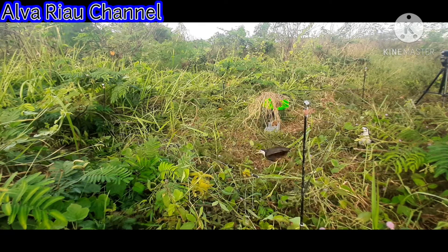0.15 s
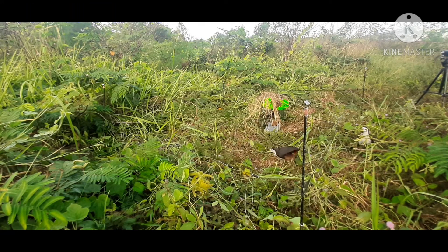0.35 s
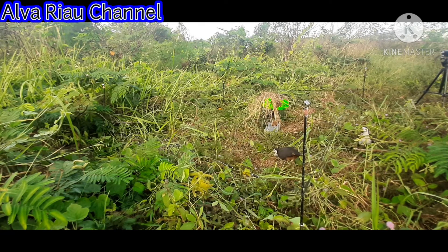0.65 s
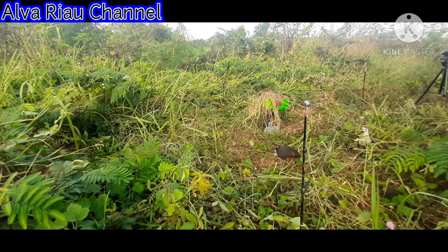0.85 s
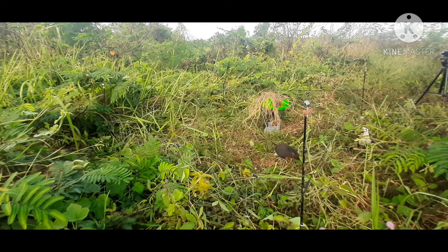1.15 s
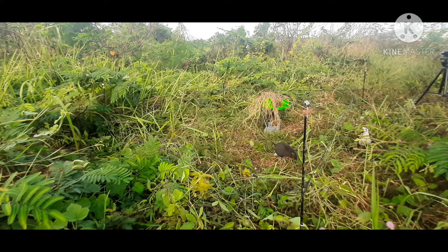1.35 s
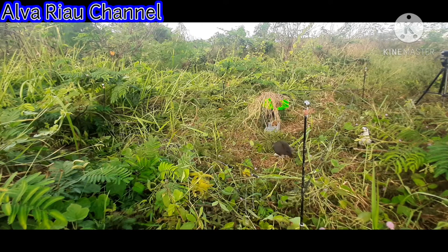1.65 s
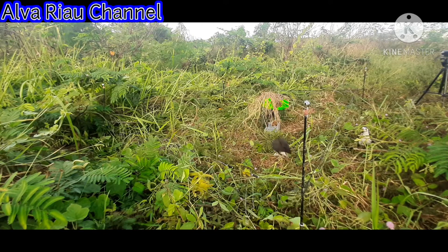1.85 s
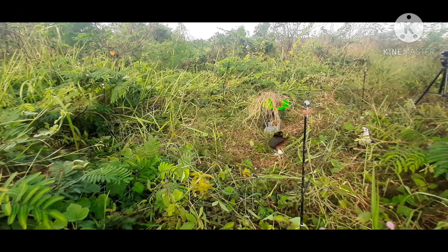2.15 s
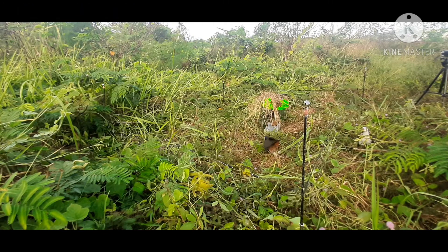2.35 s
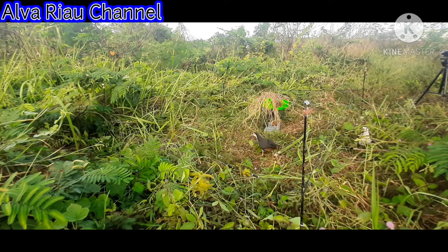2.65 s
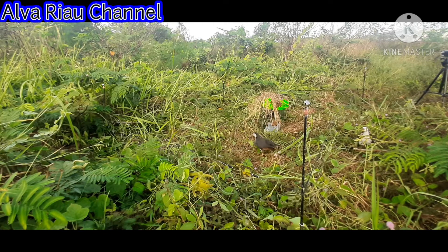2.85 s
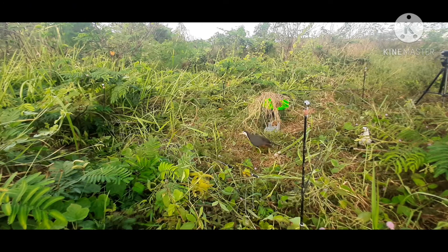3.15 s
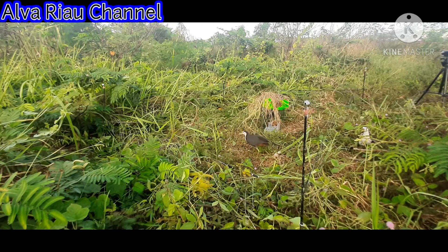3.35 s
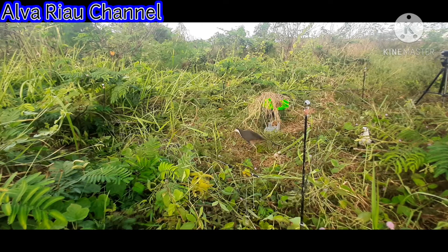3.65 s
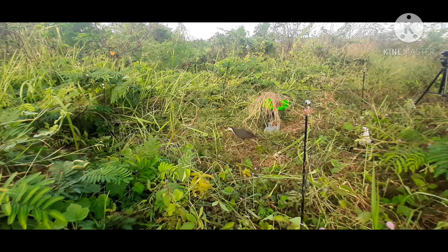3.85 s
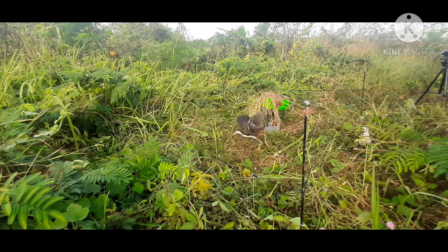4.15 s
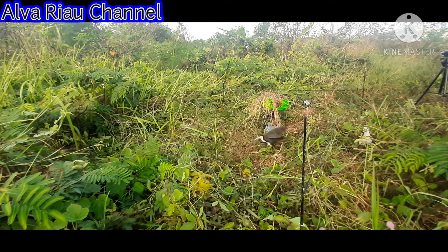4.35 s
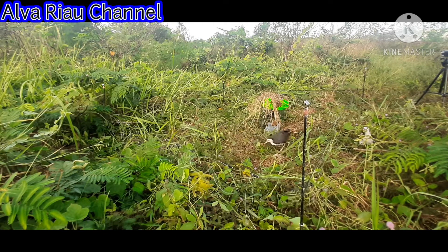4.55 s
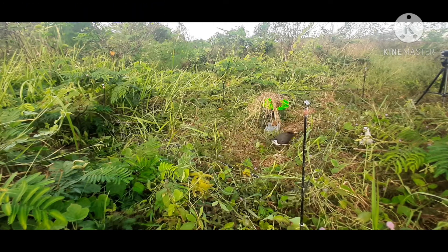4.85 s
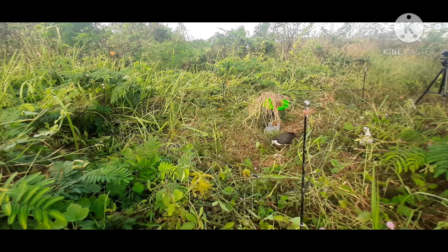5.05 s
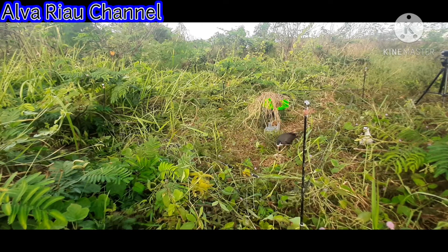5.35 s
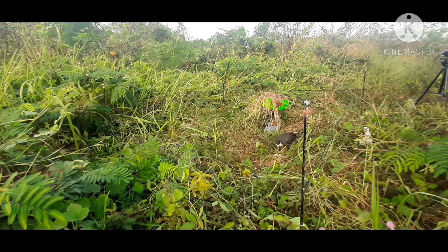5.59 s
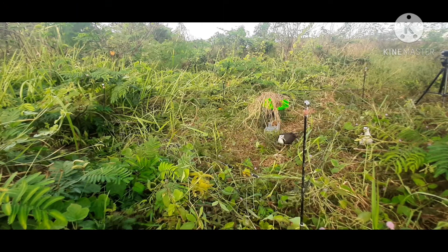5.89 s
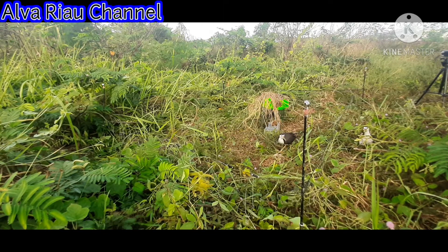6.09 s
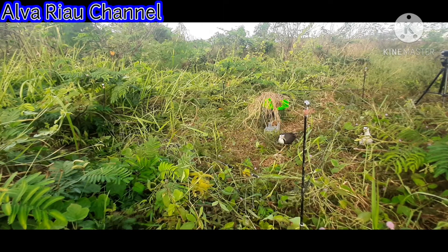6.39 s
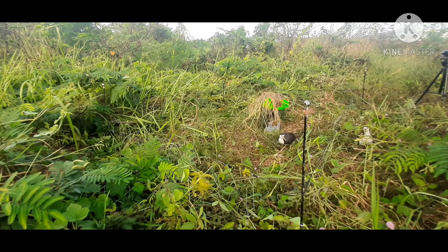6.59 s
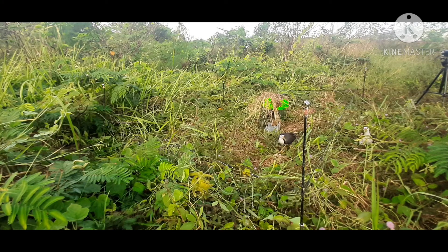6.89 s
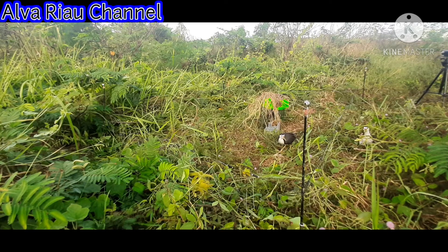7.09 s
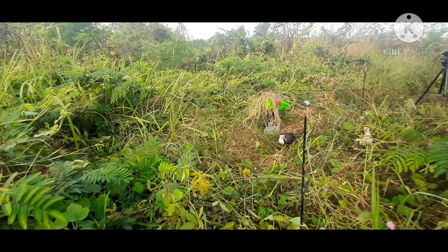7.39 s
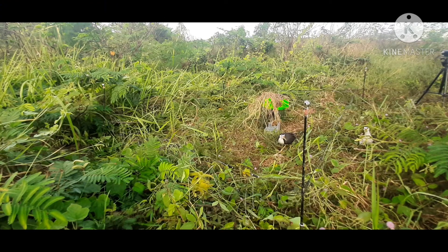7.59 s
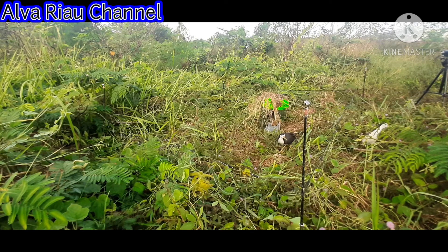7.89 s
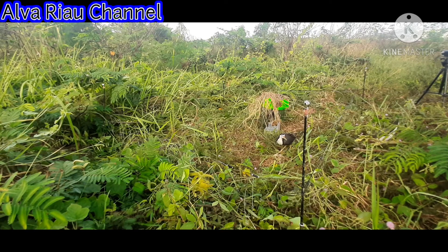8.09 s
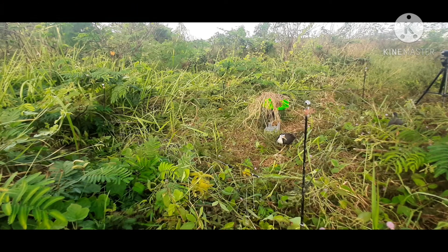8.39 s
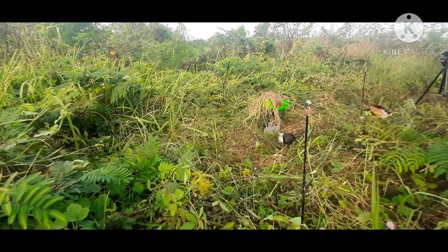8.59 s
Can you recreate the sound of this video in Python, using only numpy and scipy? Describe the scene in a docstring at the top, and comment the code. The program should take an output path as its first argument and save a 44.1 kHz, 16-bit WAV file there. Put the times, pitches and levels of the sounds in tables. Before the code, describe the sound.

In open grassy marsh, a bird gives an even series of short harsh croaks, dominant and fairly dry, slightly right of centre in stereo. Distant crickets, small gliding whistles and a faint trilling bird sit far below. Light metal pieces chatter at first, clink near the middle, then jingle most fully at the end. Soft grunts, small grass swishes and one brief insect buzz add detail over a quiet low rumble.

```python
"""Marsh undergrowth on two microphones: light metal chatter, then a waterhen's 'kwaak' about twice a second,
each a raspy start, a period-doubled break and a clear arched note; short throaty grunts fall between calls.
Small birds whistle in glides and a far trill chirps in phrases; from 4.1 s struck metal rings, noise swishes
in the grass and an insect's tone buzzes; more swishes and the fullest jingle end it.
Throughout, chirping crickets and the coloured noise of a far marsh sit over a low outdoor rumble."""
import sys
import numpy as np
from scipy import signal
from scipy.fft import rfft, irfft, next_fast_len
from scipy.io import wavfile
from scipy.ndimage import map_coordinates

SR = 44100
rng = np.random.default_rng(int(sys.argv[2]) if len(sys.argv) > 2 else 0)


def file_out(sig):
    """Save sig as 16-bit WAV at sys.argv[1]."""
    # one column per channel
    cols = np.atleast_2d(sig).T
    # limit, then scale
    lim = np.clip(cols, -1, 1)
    pcm = np.round(lim * 32767).astype(np.int16)
    wavfile.write(sys.argv[1], SR, pcm)


N = 384993
T = np.arange(N) / SR  # time [s]

# Levels are relative, ahead of the mix and of each microphone's share.
# every call has three stages: a raspy opening, a break into half pitch, and a clear note (s after its start)
BREAK_S, BREAK_TAKES_S, CLEAR_S, CLEAR_TAKES_S = .038, .0033, .056, .015
# the voice scoops up into its opening pitch and leaps from it at the break
SCOOP_SHARE, SCOOP_S, LEAP_TAKES_S = .17, .00516, .015
# the clear note climbs to its top, sags, and flicks up as the beak shuts (shares of the top pitch)
CLIMB_SHARE, CLIMB_S, CLIMB_TAKES_S = .16, .056, .027
TOP_S, SAG_SHARE, SAG_POWER, FLICK_SHARE, FLICK_TAKES_S = .07, .1433, 1.9, .08, .008
# loudness: the opening swells, the note holds and is cut off
OPEN_DB, SWELL_DB_PER_S, BREAK_DB, NOTE_DB, RELEASE_DB_PER_S = -38.5, 124.5, -35.5, -31.5, 2806
# overtones: weak in the opening, full in the note, fading as it sags; higher calls are brighter
OPEN_OVERTONE_DB, BREAK_OVERTONE_DB, NOTE_OVERTONE_DB, SAG_OVERTONE_DB = -26.5, -24, 0, -8
USUAL_TOP_HZ, BRIGHT_DB_PER_HZ = 1223.7, .0864
# half-pitch lines: strongest at the break, dying away in the note
OPEN_HALF_DB, BREAK_HALF_DB, NOTE_HALF_DB, HALF_FADE_DB_PER_S = -11, 3, -14.5, 448.5
# roughness of each stage, to be scaled by the rasp of the call
OPEN_ROUGH, BREAK_ROUGH, NOTE_ROUGH = .34, .3, .03
# where the voice catches it dips, roughens and scoops up again from below, in proportion to the rasp
CATCH_TAKES_S, CATCH_DIP_DB, CATCH_DROP_SHARE, CATCH_RECOVER_S = .003, -7, .3, .007
CATCH_ROUGH, CATCH_ROUGH_S = .75, .007
# partials flicker in proportion to their multiple, and slip in phase with its square
FLICKER_DB, FLICKER_PER_S, SLIP_RAD, SLIP_PER_S = .6, 110, .009, 500
BEAK_HZ = 1850  # the half-shut beak holds back the partials around and above this until the note opens
SHUT_HZ, SHUT_DB, SHUT_T60_S = 1226, -39, .037  # the cut-off leaves the throat ringing for a moment
FLARE_S, FLARE_TAKES_S, FLARE_DB = .098, .008, 6  # a second rasp flares in the treble as the note sags
METAL_DETUNE_SHARE = .0013  # the pieces touch, so each tap rings a little off the last
TICK_S, SCRAPE_S, SCRAPE_DB = .0008, .008, -22.5  # a sharp tick with a faint scrape after it
CHATTER_PER_S, CHATTER_SPREAD_DB = 90, 3
TRILL_SWELL_S, TRILL_SWELL_DB, TRILL_FADE_S = .45, 24, .03
WHISTLE_ARCH_HZ = 45.6
# one insect's buzz swells, rises slowly in pitch and stops short
BUZZ_S, BUZZ_LENGTH_S, BUZZ_ATTACK_S, BUZZ_RELEASE_S = 4.82, .69, .33, .03
BUZZ_HZ, BUZZ_RISE_HZ_PER_S, BUZZ_THROB_HZ, BUZZ_DB = 8760, 520, 68, -68
BIRD_LEFT_DB = -3.2
TOP_HZ = 15600


def undb(db):
    """Decibels to gain."""
    return 10 ** (np.asarray(db) / 20)


def unit(x):
    """Scale to rms 1."""
    return x / np.sqrt(np.mean(np.abs(x) ** 2))


def add(out, s, x):
    """Mix x into out from time s."""
    i = max(int(s * SR), 0)
    out[i:i + len(x)] += x[:max(N - i, 0)]


def colour(x, points):
    """Filter by a spectrum of (Hz, dB) points."""
    hz, db = np.transpose(points)
    f = np.maximum(np.fft.rfftfreq(len(x), 1 / SR), 1)
    gain = undb(np.interp(np.log(f), np.log(np.maximum(hz, 1)), db))
    return irfft(rfft(x) * gain, len(x))


def noise(points, size=N):
    """Coloured noise, brought to rms 1."""
    white = rng.standard_normal(next_fast_len(size, True))
    return unit(colour(white, points)[:size])


def wander(t, rate):
    """Smooth chance with spread near 1 that changes rate times a second."""
    knots = rng.standard_normal(int(t[-1] * rate) + 2)
    return map_coordinates(knots, [t * rate], order=2, mode="nearest")


def resonate(x, hz, width_hz):
    """One resonance, gain 1 at its centre."""
    return signal.lfilter(*signal.iirpeak(hz, hz / width_hz, fs=SR), x)


def highpass(x, hz):
    """A steep cut below hz."""
    return signal.sosfilt(signal.cheby2(6, 40, hz, "highpass", fs=SR, output="sos"), x)


def ease(t, at, takes):
    """A smooth step from 0 to 1, centred on at."""
    return .5 + .5 * np.sin(np.pi * np.clip((t - at) / takes, -.5, .5))


def bump(t, at, takes):
    """A brief smooth rise from 0 to 1 and back."""
    return np.exp(-((t - at) / takes) ** 2)


def held(s, length, attack, release):
    """Attack, hold and release of one event, as a gain."""
    return np.clip(np.minimum((T - s) / attack, (s + length - T) / release), 0, 1)


def place(x, left_db, lag_ms):
    """Two microphones: the left hears x at left_db and lag_ms later than the right (earlier if negative)."""
    late = map_coordinates(x, [np.arange(N) - lag_ms * SR / 1000], order=3)
    return np.array([undb(left_db) * late, x])


def waterhen():
    """The near bird's calls, with grunts in some of the gaps."""
    # calls: (time [s], length [s], level [dB], top pitch [Hz], opening pitch [Hz], rasp [0-1],
    #         catch of the voice after the start [s])
    call_rows = [(0.232, 0.11, -1, 1218, 869, 0.87, 0.035), (0.689, 0.1, 0.5, 1182, 814, 0.17, 0.041),
                 (1.185, 0.11, 1, 1181, 713, 0.9, .024), (1.6288, .11, 0.6, 1203, 861, 0.46, 0.04),
                 (2.079, 0.11, 1, 1198, 878, 0.58, 0.029), (2.516, 0.11, 0.7, 1202, 881, 0.68, 0.028),
                 (2.965, 0.11, 0.5, 1193, 827, 0.63, 0.0079), (3.4057, 0.11, 0, 1211, 848, 0.65, 0.031),
                 (3.85, 0.11, 1, 1205, 804, 0.6, 0.0093), (4.2974, 0.11, 1.5, 1202, 869, 0.42, 0.037),
                 (4.7437, 0.114, 0, 1206, 894, 0.89, 0.033), (5.188, 0.11, 0.5, 1199, 898, 0.75, 0.022),
                 (5.6439, 0.11, 1, 1200, 853, 0.8, 0.015), (6.095, 0.11, 0.5, 1195, 892, 0.71, 0.037),
                 (6.5478, 0.11, 0.5, 1199, 875, 0.57, 0.036), (7.004, 0.11, 0.5, 1187, 863, 0.34, .037),
                 (7.4625, 0.113, 1, 1196, 860, 0.54, 0.031), (7.957, 0.11, 0.5, 1184, 770, 0.74, .011),
                 (8.401, 0.11, 1.4, 1194, 859, 0.9, 0.0249)]
    # grunts: (time [s], length [s], level [dB], throat resonance [Hz],
    #          low thump [dB re throat], sharpness [dB re throat])
    grunt_rows = [(0.784, 0.016, -35, 1200, -26, -16), (0.845, 0.019, -39.5, 1070, -2, -19.5),
                  (1.362, 0.027, -40.5, 1060, -2.5, -31), (1.938, 0.028, -43.5, 1030, 0, -48),
                  (4.663, 0.0085, -46.5, 1263, -3.5, -36), (7.821, 0.016, -32, 1266, -13.5, -7.5),
                  (8.170, 0.018, -34, 1290, -14, -8), (8.712, 0.012, -41, 1330, -22, -5)]
    out = np.zeros(N)
    for s, length, db, top_hz, open_hz, rasp, catch_s in call_rows:
        add(out, s, undb(db) * call(length, top_hz, open_hz, rasp, catch_s))
    for s, length, db, hz, thump_db, sharp_db in grunt_rows:
        add(out, s, undb(db) * grunt(length, hz, thump_db, sharp_db))
    return out


def call(length, top_hz, open_hz, rasp, catch_s):
    """The syrinx croaks and catches, doubles its period, then locks into an arched note with frayed overtones."""
    # partials of the voice, the odd ones strong: (multiple of the pitch, level [dB re fundamental])
    partials = [(2, -23), (3, -1.5), (4, -20.5), (5, -14.5), (7, -29)]
    # lines between the partials: (multiple of the pitch, level [dB before the split])
    half_partials = [(.5, -3), (1.5, -5), (2.5, -5.5), (3.5, 1)]
    # faint lines between and beside the high partials: (multiple of the pitch, level [dB before the flare])
    frayed_partials = [(4.5, -34.5), (5.5, -34), (6, -52), (6.5, -30.5), (8, -64)]
    t = np.arange(int(.14 * SR)) / SR
    hz, db, overtone_db, half_db, rough = gesture(t, length, top_hz, open_hz)

    since = np.maximum(t - catch_s, 0)
    drop = CATCH_DROP_SHARE * ease(t, catch_s, CATCH_TAKES_S) * np.exp(-since / CATCH_RECOVER_S)
    hz = hz * (1 - rasp * drop)
    db = db + rasp * CATCH_DIP_DB * bump(t, catch_s, CATCH_TAKES_S)
    rough = rasp * (rough + CATCH_ROUGH * bump(t, catch_s, CATCH_ROUGH_S))

    # slow lurches in the rasp, and a small jitter from cycle to cycle that frays the high partials
    jitter = (.003 + .19 * rough) * wander(t, 520) + .009 * wander(t, 2200)
    phase = 2 * np.pi * np.cumsum(hz * (1 + jitter)) / SR
    edge = undb(overtone_db)
    flare = undb(FLARE_DB * bump(t, FLARE_S, FLARE_TAKES_S))

    def lines(rows):
        """Flickering partials, muffled above the beak's limit while it is half shut."""
        total = np.zeros(len(t))
        for k, line_db in rows:
            gain = undb(line_db + FLICKER_DB * k * wander(t, FLICKER_PER_S))
            muffle = edge ** ease(k * hz, BEAK_HZ, BEAK_HZ / 2)
            slip = SLIP_RAD * k ** 2 * wander(t, SLIP_PER_S)
            total += gain * muffle * np.sin(k * phase + slip)
        return total

    # strong and weak cycles alternate, which puts lines between the partials; a smooth start hardly splits
    split = undb(half_db + 2 * rng.standard_normal()) * min(rasp / .36, 1) ** 2
    voice = np.sin(phase) + lines(partials) + split * lines(half_partials) + flare * lines(frayed_partials)
    voice *= 1 + .55 * rough * wander(t, 700)
    # while the voice is rough, turbulent air rings the throat, pulsing at half the pitch
    air = resonate(resonate(rng.standard_normal(len(t)), 1250, 800), 1250, 800)
    voice += undb(-15) * rough * unit(air) * (1 + np.cos(phase / 2))
    hiss = noise([(400, 1), (1200, -12), (2100, -6.5), (3400, -10), (4800, -13), (6200, 9),
                  (8000, -8.5), (10500, -10.5), (13000, -16)], size=len(t))
    voice += undb(-27.5 + 2 * wander(t, 160)) * flare * np.sqrt(edge) * hiss * (1 + np.cos(phase))

    after = np.maximum(t - length, 0)
    shut = undb(SHUT_DB - 60 * after / SHUT_T60_S) * np.sin(2 * np.pi * SHUT_HZ * after)
    onset = np.minimum(t / .00083, 1)
    return highpass(np.sqrt(2) * (voice * undb(db) * onset + shut), hz=382)


def gesture(t, length, top_hz, open_hz):
    """Pitch, level, overtones, half-pitch lines and roughness as a call moves through its three stages."""
    broken, clear = ease(t, BREAK_S, BREAK_TAKES_S), ease(t, CLEAR_S, CLEAR_TAKES_S)

    def stages(opening, breaking, note):
        """Cross from each stage's value to the next."""
        return opening + broken * (breaking - opening) + clear * (note - breaking)

    sag = np.clip((t - TOP_S) / (length - FLICK_TAKES_S / 2 - TOP_S), 0, 1) ** SAG_POWER
    climb = CLIMB_SHARE * (1 - ease(t, CLIMB_S, CLIMB_TAKES_S))
    flick = FLICK_SHARE * ease(t, length + .0019, FLICK_TAKES_S)
    arch = 1 - climb - SAG_SHARE * sag + flick
    opening_hz = open_hz * (1 - SCOOP_SHARE * np.exp(-t / SCOOP_S))
    hz = opening_hz + ease(t, BREAK_S, LEAP_TAKES_S) * (top_hz * arch - opening_hz)

    release_db = RELEASE_DB_PER_S * np.maximum(t - length, 0)
    db = stages(OPEN_DB + SWELL_DB_PER_S * t, BREAK_DB, NOTE_DB) - release_db
    bright_db = BRIGHT_DB_PER_HZ * (top_hz - USUAL_TOP_HZ)
    note_overtone_db = NOTE_OVERTONE_DB + SAG_OVERTONE_DB * sag ** 2 + bright_db
    overtone_db = stages(OPEN_OVERTONE_DB, BREAK_OVERTONE_DB, note_overtone_db) - release_db
    note_half_db = NOTE_HALF_DB - HALF_FADE_DB_PER_S * (t - CLEAR_S)
    half_db = stages(OPEN_HALF_DB, BREAK_HALF_DB, note_half_db)
    return hz, db, overtone_db, half_db, stages(OPEN_ROUGH, BREAK_ROUGH, NOTE_ROUGH)


def grunt(length, hz, thump_db, sharp_db):
    """A few uneven pulses ring the throat, over a soft low thump and a sharp burst of noise."""
    t = np.arange(int(.06 * SR)) / SR
    gate = np.exp(-np.maximum(t - length + .0012, 0) / .0023)
    cycle = np.cumsum(310 * np.exp(.24 * wander(t, 300))) / SR
    ticks = np.diff(np.floor(cycle), prepend=-1)
    pulses = (ticks + .12 * rng.standard_normal(len(t))) * gate
    throat = pulses
    for _ in range(4):  # the same resonance several times over gives steep flanks
        throat = resonate(throat, hz, width_hz=615)
    thump = resonate(resonate(pulses * t / length, 320, 250), 190, 260)
    sharp = gate * noise([(900, -27), (2100, 5), (3500, -9.5), (6000, -14), (7700, -18),
                          (9500, -44.5), (14000, -15)], size=len(t))
    mix = unit(throat) + undb(thump_db) * unit(thump) + undb(sharp_db) * unit(sharp)
    return mix * np.sqrt(length / t[-1])


def jingle():
    """Small metal pieces knock together: shakes of light random chatter, and clear taps in the later ones."""
    # clear metal taps: (time [s], click [dB], low ring [dB], high ring [dB])
    tap_rows = [(4.087, -31, -54, -50), (4.0982, -19.5, -28.5, -30.5), (4.1157, -16, -26, -32.5),
                (4.145, -33, -36.5, -51), (4.157, -41, -60, -48), (4.203, -44, -61, -50),
                (4.232, -33, -58, -49.5), (8.5255, -33, -45.5, -52), (8.544, -23, -30.5, -37.5),
                (8.565, -12.5, -37, -45), (8.568, -29, -24, -38), (8.5775, -32, -25, -27),
                (8.6071, -24, -28.5, -50), (8.613, -16, -27.5, -34), (8.6179, -17, -36, -23.5),
                (8.6312, -21, -47, -48), (8.636, -44, -45, -33), (8.651, -32, -45, -41),
                (8.664, -26, -31, -48), (8.6773, -18.5, -26, -39), (8.708, -24, -46, -32.5)]
    # shakes of chatter: (time [s], length [s], click [dB], low ring [dB], high ring [dB])
    shake_rows = [(0, .23, -43, -64, -66.5), (4.087, .09, -42, -61, -65), (8.56, .17, -40, -43, -48)]
    out = np.zeros(N)
    for s, click_db, low_db, high_db in tap_rows:
        add(out, s, tap(click_db, low_db, high_db))
    for s, length, click_db, low_db, high_db in shake_rows:
        for slot in np.arange(0, length, 1 / CHATTER_PER_S):
            db = CHATTER_SPREAD_DB * rng.standard_normal()
            at = s + slot + rng.random() / CHATTER_PER_S
            add(out, at, undb(db) * tap(click_db, low_db, high_db))
    return highpass(out, hz=2630)  # pieces this small radiate no lows


def tap(click_db, low_db, high_db):
    """A tap clicks and rings the metal; where it lands sets the share of low and high modes."""
    # what the metal rings with: (frequency [Hz], level [dB re the low or high ring], t60 [s])
    modes = [(4487, -5.5, 0.17), (4490, -9, .06), (5233, -17.5, .12), (5780, -22, .05), (11723, -11, .11),
             (12435, -3.5, 0.14), (12450, -1.5, 0.05)]
    # colour of the contact noise: (frequency [Hz], level [dB])
    click_colour = [(500, -75), (1500, -36), (2900, -47), (3700, -26), (4600, -9.5), (5800, 9), (7000, -6),
                    (9000, -6), (11000, -2), (12500, -14.5), (15000, -4)]
    t = np.arange(int(.3 * SR)) / SR
    contact = np.exp(-t / TICK_S) + undb(SCRAPE_DB) * np.exp(-t / SCRAPE_S)
    out = undb(click_db - 8.5) * noise(click_colour, size=len(t)) * contact
    detune = 1 + METAL_DETUNE_SHARE * rng.standard_normal()
    for hz, db, t60 in modes:
        ring_db = low_db if hz < SR / 5 else high_db
        out += undb(db + ring_db - 60 * t / t60) * np.sin(2 * np.pi * hz * detune * t)
    return out


def undergrowth(x, wet_db, t60, points):
    """Leaves and stems scatter a short diffuse tail, different at each microphone."""
    t = np.arange(int(.5 * SR)) / SR
    envelope = undb(-60 * t / t60) * np.minimum(t / .0057, 1)
    tails = [noise(points, size=len(t)) * envelope for _ in range(2)]
    return undb(wet_db) * np.array([signal.fftconvolve(x, h / np.linalg.norm(h))[:N] for h in tails])


def grass_swishes():
    """Fluttering noise rises and falls as something swishes in the grass."""
    # swishes: (time of the peak [s], level [dB], rise [dB/s], fall [dB/s])
    swish_rows = [(4.43, -59, 90, 151), (4.899, -63, 108.5, 90), (7.79, -45.5, 67.5, 116),
                  (8.4, -64.5, 22, 9)]
    # colour of the grass: (frequency [Hz], level [dB])
    grass_colour = [(350, -23), (600, -13.5), (950, 1.5), (1500, -3), (2100, -1.5), (2700, -10.5),
                    (3600, -13.5), (5000, -27.5), (9000, -48)]
    brush = sum(undb(db - np.maximum(rise * (s - T), fall * (T - s))) for s, db, rise, fall in swish_rows)
    swish = noise(grass_colour) * brush * undb(2.8 * wander(T, 150))
    return place(swish, -2.3, -.48)


def small_life():
    """Far birds, crickets and one buzzing insect, spread across the two microphones."""
    cricket = undb(-73.5) * chirps(7180, 200, 16, .0097)
    groups = np.clip(1 + 2 * np.sin(2 * np.pi * 9.4 * T), 0, 1)
    grouped = undb(-87.5) * chirps(8800, 340, 70, .005) * groups
    soft = far_trill() + whistles() + low_crickets() + cricket_chorus()
    return place(soft, -3, -.047) + place(cricket, -10, .053) + place(grouped + insect_buzz(), .59, 0)


def whistles():
    """Small birds slide from one pitch to another over a slight arch, as thin sine tones."""
    # whistles: (time [s], length [s], start pitch [Hz], end pitch [Hz], level [dB])
    whistle_rows = [(0.172, 0.11, 3620, 3630, -56.5), (1.396, 0.14, 4300, 3600, -63.5),
                    (2.5, 0.11, 4690, 4060, -60.5), (4.491, 0.073, 4790, 3990, -59),
                    (4.551, 0.087, 4150, 3550, -61.5), (4.924, 0.083, 3570, 3570, -68),
                    (5.408, 0.077, 4690, 4120, -64.5), (5.57, 0.096, 3900, 3660, -62),
                    (7.876, 0.12, 3540, 3780, -66), (8.3, 0.11, 4910, 4350, -62.5)]
    out = np.zeros(N)
    for s, length, start_hz, end_hz, db in whistle_rows:
        u = np.linspace(0, 1, int(length * SR))
        arch = np.sin(np.pi * u)
        hz = start_hz + (end_hz - start_hz) * u + WHISTLE_ARCH_HZ * arch + 60 * wander(u * length, 500)
        add(out, s, undb(db) * arch * np.sin(2 * np.pi * np.cumsum(hz) / SR))
    return out


def far_trill():
    """Each phrase of a far bird's falling chirps swells, holds and stops."""
    # phrases: (time [s], length [s], level [dB])
    phrases = [(1.003, 0.73, -62), (3.092, 0.6, -61), (5.44, 0.67, -62), (8.01, 0.64, -61.5)]
    swell = np.zeros(N)
    for s, length, db in phrases:
        below_db = TRILL_SWELL_DB * np.clip(1 - (T - s) / TRILL_SWELL_S, 0, 1)
        swell += undb(db - below_db) * held(s, length, TRILL_FADE_S, TRILL_FADE_S)
    return swell * undb(3.2 * wander(T, 6.8)) * chirps(3468, 950, 21.7, .0047)


def chirps(hz, fall_hz, rate, blur):
    """A train of soft falling chirps with near silence between, blurred by distance."""
    cycle = np.cumsum(rate * (1 + .05 * wander(T, 3.7))) / SR % 1
    pitch = hz + fall_hz * (.5 - cycle) + blur * hz * wander(T, 400)
    train = np.sin(np.pi * cycle) ** 4 * np.sin(2 * np.pi * np.cumsum(pitch) / SR)
    return unit(train) * undb(2 * wander(T, 12))


def low_crickets():
    """Slow low chirps come up in bouts over a faint steady level."""
    # bouts: (time [s], length [s], level [dB])
    bout_rows = [(1.756, 0.35, -74.5), (3.673, 0.67, -71), (6.187, 0.75, -75), (7.597, 0.95, -77)]
    bouts = sum(undb(db) * held(s, length, attack=.054, release=.05) for s, length, db in bout_rows)
    return (bouts + undb(-83.5)) * chirps(3380, 400, 16, .011)


def cricket_chorus():
    """Two blurred chirp trains drift in level."""
    return sum(undb(-78 + 3.7 * wander(T, 3)) * chirps(hz, 600, rate, .045)
               for hz, rate in [(4960, 33), (4640, 17)])


def insect_buzz():
    """One unsteady, throbbing tone rises in pitch and stops short."""
    hz = (BUZZ_HZ + BUZZ_RISE_HZ_PER_S * (T - BUZZ_S)) * (1 + .021 * wander(T, 1600))
    throb = 1 + .5 * np.sin(2 * np.pi * BUZZ_THROB_HZ * T)
    gate = held(BUZZ_S, BUZZ_LENGTH_S, BUZZ_ATTACK_S, BUZZ_RELEASE_S)
    return undb(BUZZ_DB) * throb * gate * np.sin(2 * np.pi * np.cumsum(hz) / SR)


def far_marsh():
    """The far marsh and its insect chorus: diffuse noise, separate at each microphone and drifting in level."""
    # colour of the marsh: (frequency [Hz], level [dB])
    marsh_colour = [(300, -6), (650, -6), (1100, -11), (1800, -11.5), (2600, -17.5), (3400, -6.5),
                    (4000, -8.5), (5000, -13), (5800, -22.5), (7300, -5.5), (8300, -18.5), (10000, -22.5),
                    (13000, -11), (15500, -15.5)]
    return np.array([undb(db + wander(T, 1.3)) * noise(marsh_colour) for db in (-70.5, -67.5)])


def outdoor_rumble():
    """Low noise mostly common to both microphones, slowly changing in level."""
    # colour of the rumble: (frequency [Hz], level [dB])
    rumble_colour = [(18, -53), (31, -27.5), (42, -9.5), (60, 2.5), (72, -8.5), (100, -7.5), (190, -15.5),
                     (300, -25), (430, -37.5), (900, -65.5)]
    # course of the rumble: (time [s], level [dB])
    level_rows = [(0, -46.5), (2.8, -48.5), (7.3, -47), (8.4, -45.5)]
    common = place(noise(rumble_colour), -2.86, .052)
    apart = undb(-14.5) * np.array([noise(rumble_colour), noise(rumble_colour)])
    return (common + apart) * undb(np.interp(T, *np.transpose(level_rows)))


def scene():
    """The bird and the metal lie a little to the right, among scattering plants."""
    bird, metal, life = waterhen(), jingle(), small_life()
    near = undergrowth(bird, wet_db=-18, t60=.11, points=[
        (300, -8), (1100, -5), (3400, -3), (6000, 3), (9000, 3), (14000, -4)])
    far = undergrowth(bird, wet_db=-12, t60=.28, points=[
        (400, -6), (1100, -13), (2100, 7.5), (3400, -12.5), (7000, 4), (12000, 6.5)])
    shimmer = undergrowth(metal, wet_db=-7, t60=.29, points=[(4500, .052), (12000, .044)])
    blur = undergrowth(life[1], wet_db=-6, t60=.12, points=[(3500, -8), (4200, 2.5), (7000, -8)])
    foreground = place(bird, BIRD_LEFT_DB, .11) + near + far + place(metal, -5, .153) + shimmer
    background = undb(1.5) * life + blur + far_marsh() + outdoor_rumble()
    return foreground + grass_swishes() + background


def record(dry):
    """The recorder cuts steeply above TOP_HZ."""
    return signal.sosfilt(signal.ellip(10, .2, 80, TOP_HZ, fs=SR, output="sos"), dry)


dry = scene()
out = record(dry)
file_out(out)
```